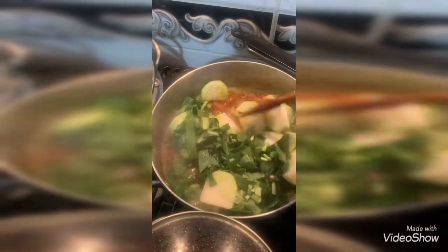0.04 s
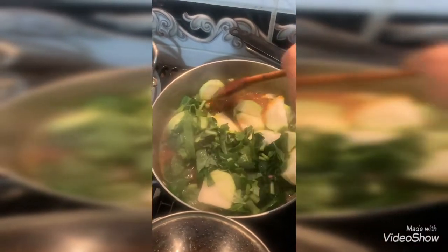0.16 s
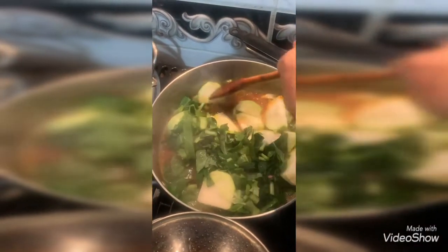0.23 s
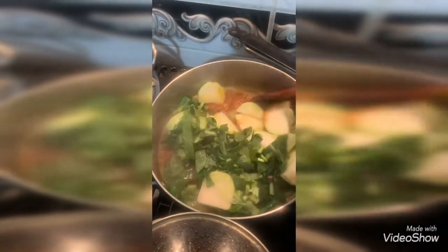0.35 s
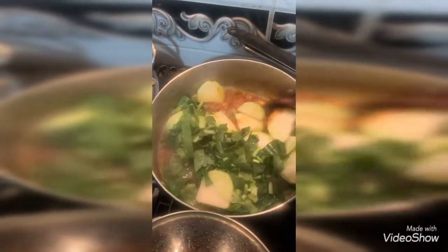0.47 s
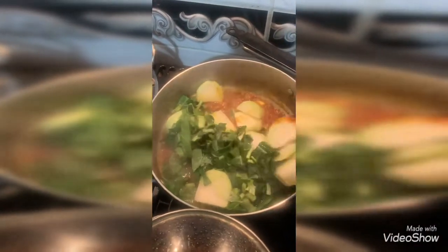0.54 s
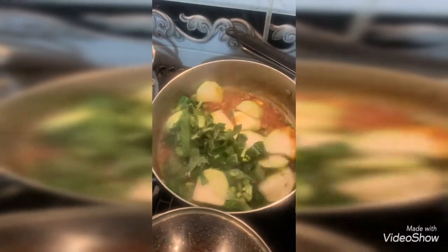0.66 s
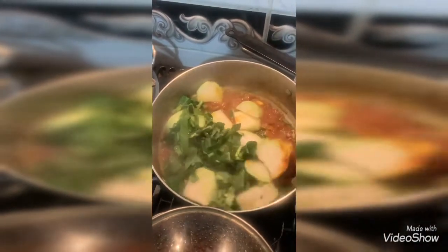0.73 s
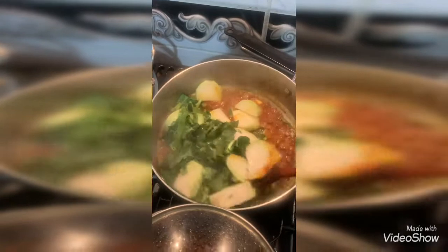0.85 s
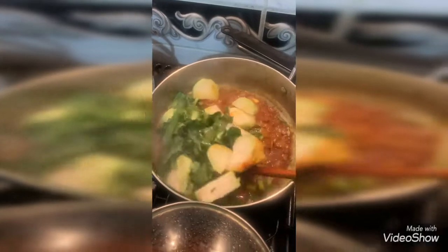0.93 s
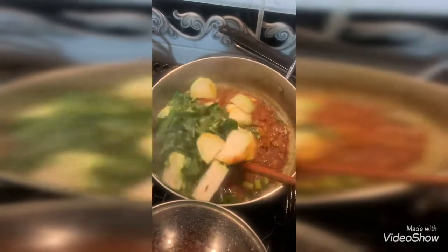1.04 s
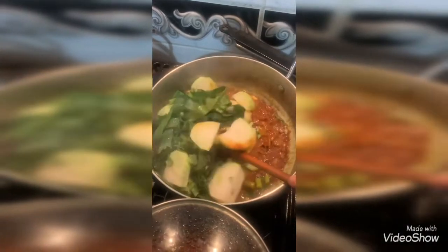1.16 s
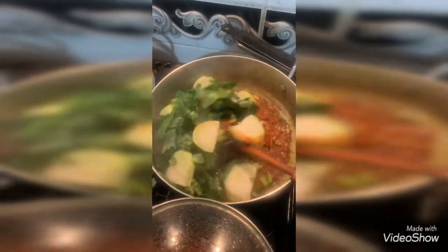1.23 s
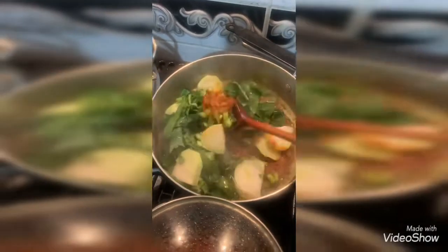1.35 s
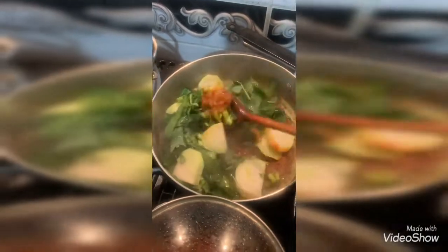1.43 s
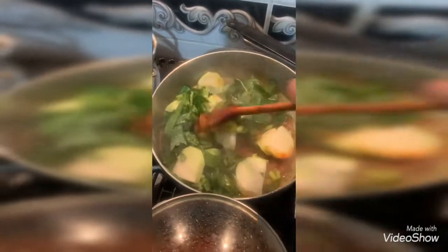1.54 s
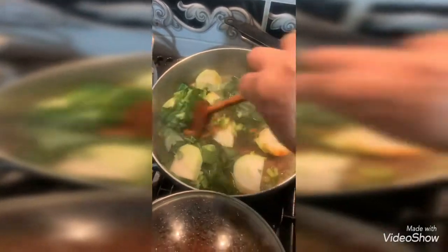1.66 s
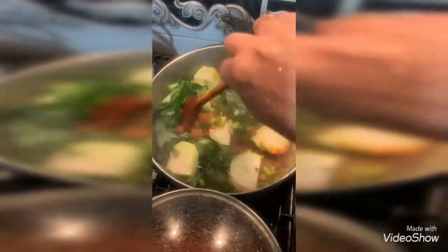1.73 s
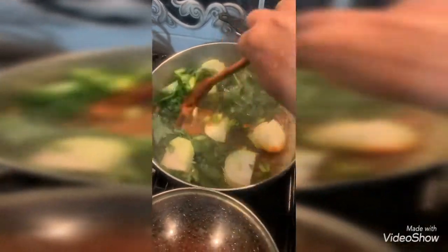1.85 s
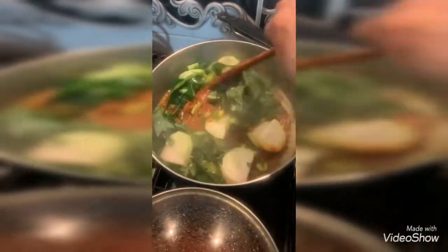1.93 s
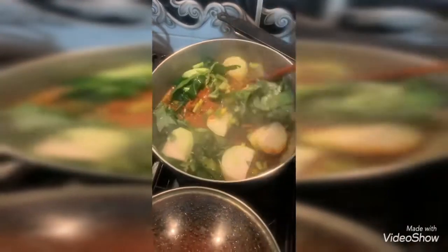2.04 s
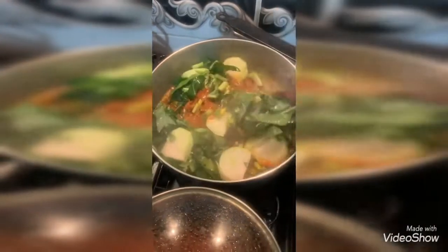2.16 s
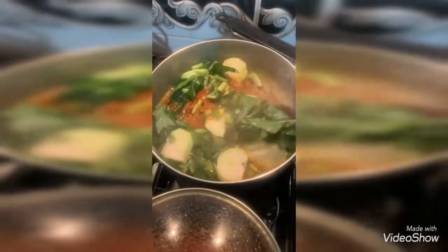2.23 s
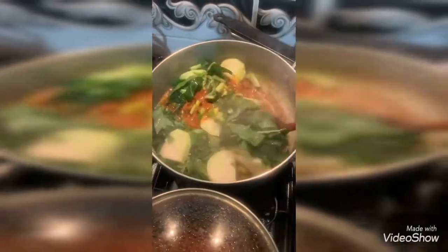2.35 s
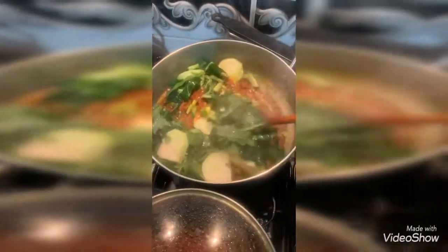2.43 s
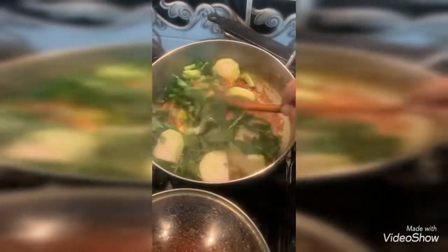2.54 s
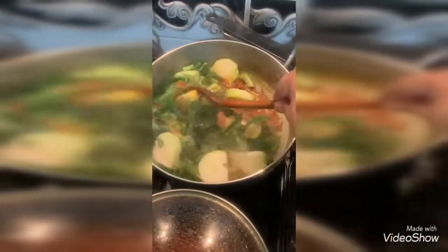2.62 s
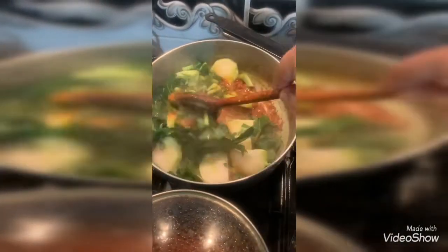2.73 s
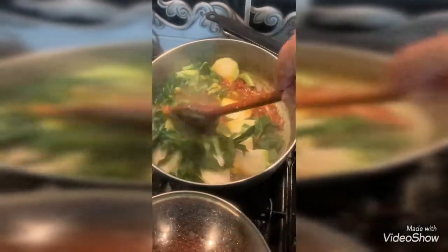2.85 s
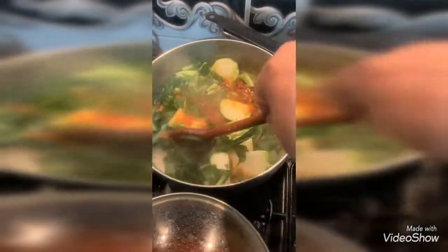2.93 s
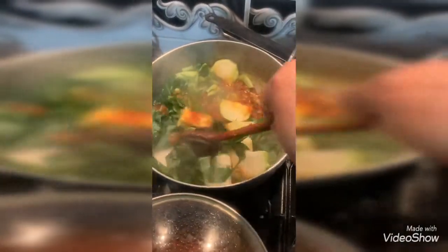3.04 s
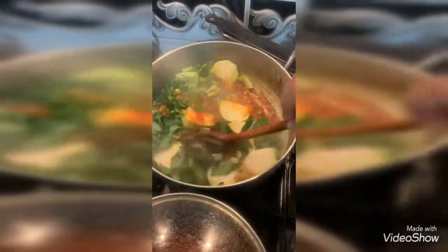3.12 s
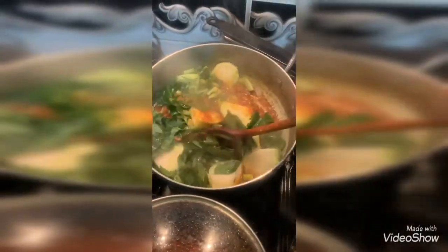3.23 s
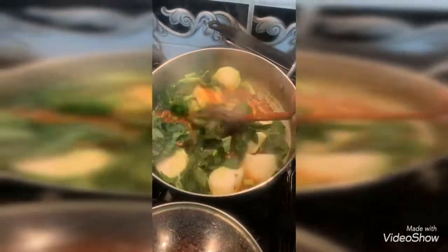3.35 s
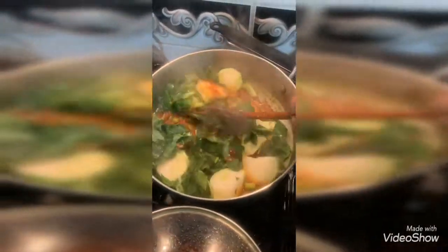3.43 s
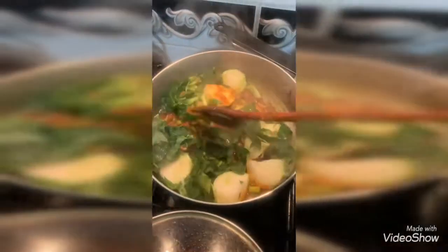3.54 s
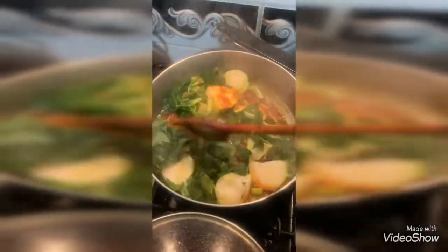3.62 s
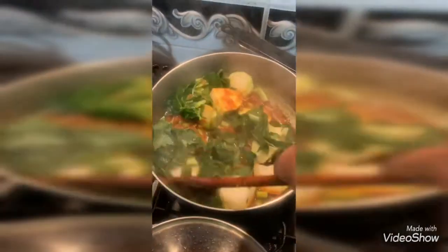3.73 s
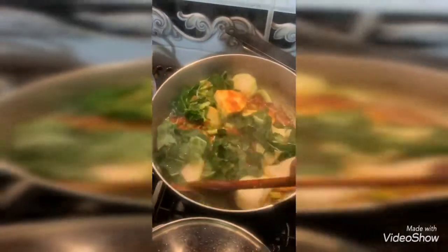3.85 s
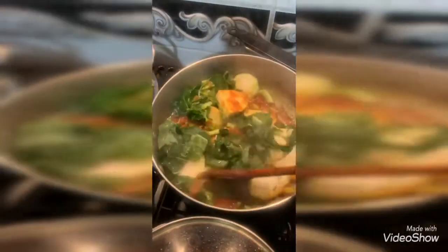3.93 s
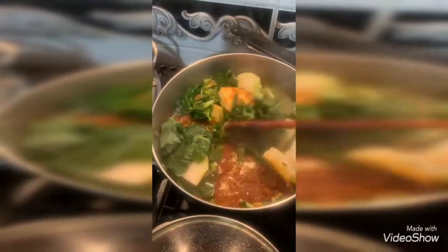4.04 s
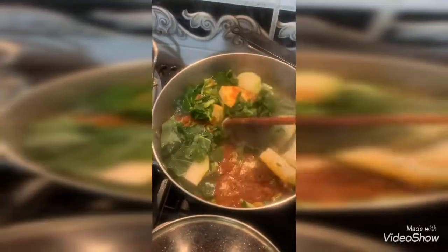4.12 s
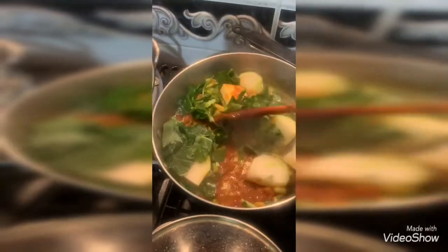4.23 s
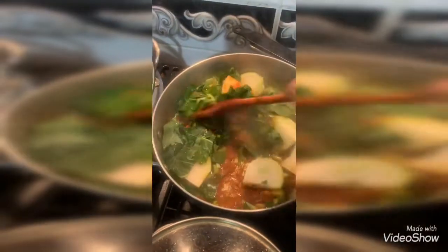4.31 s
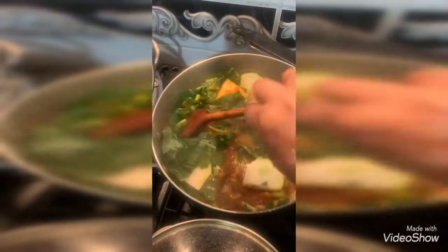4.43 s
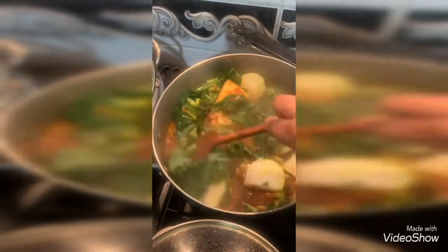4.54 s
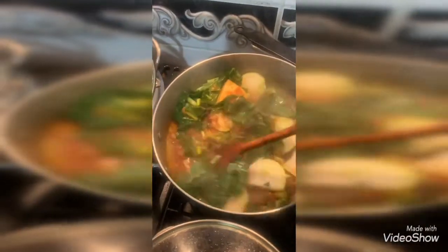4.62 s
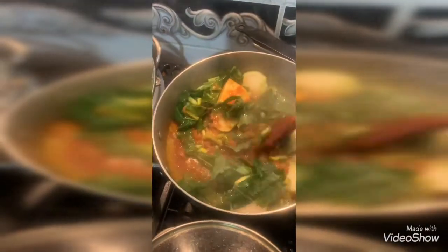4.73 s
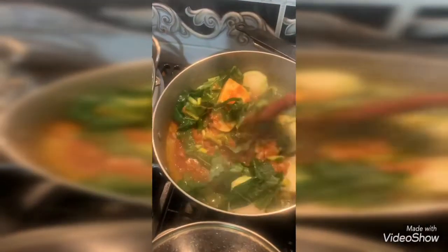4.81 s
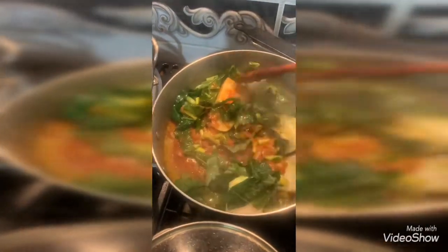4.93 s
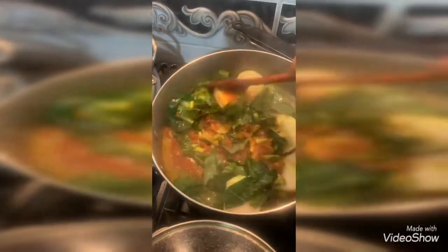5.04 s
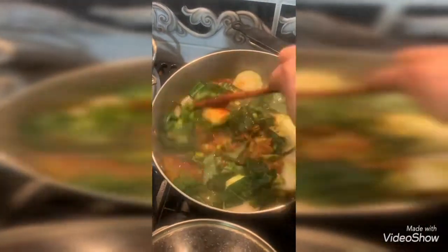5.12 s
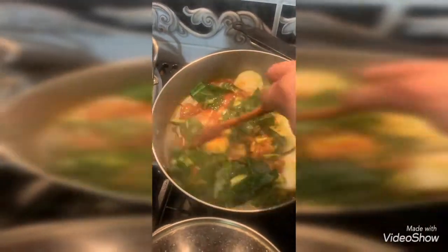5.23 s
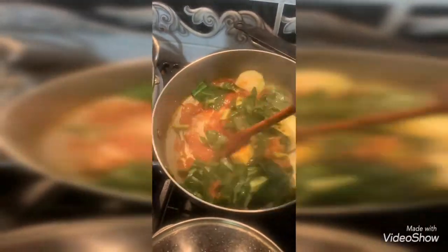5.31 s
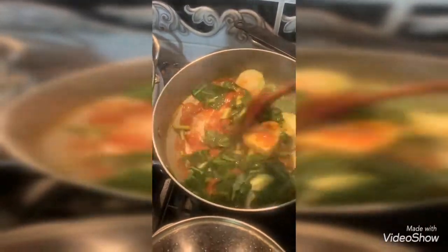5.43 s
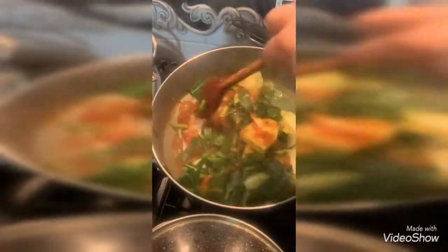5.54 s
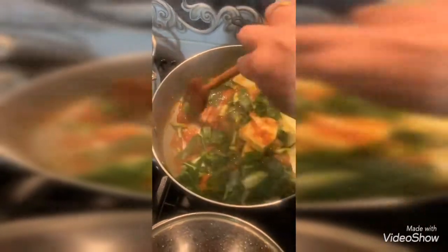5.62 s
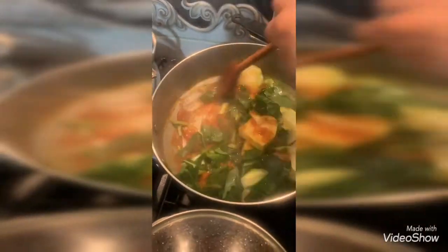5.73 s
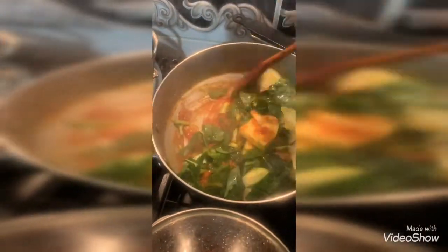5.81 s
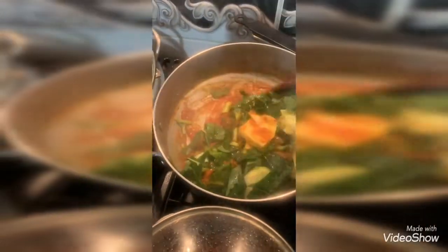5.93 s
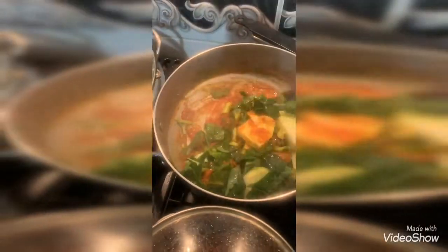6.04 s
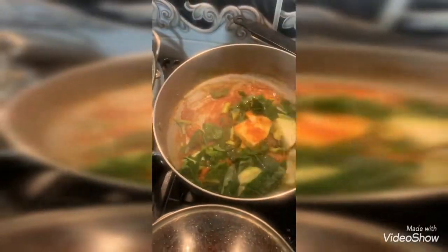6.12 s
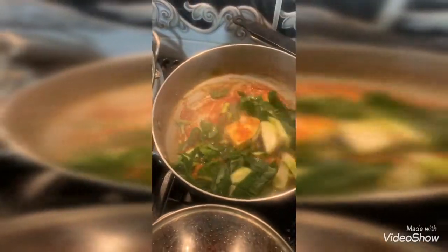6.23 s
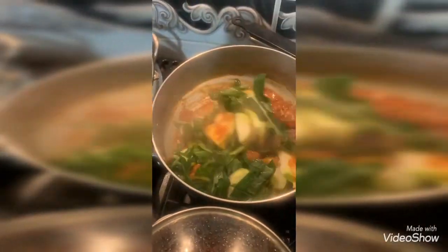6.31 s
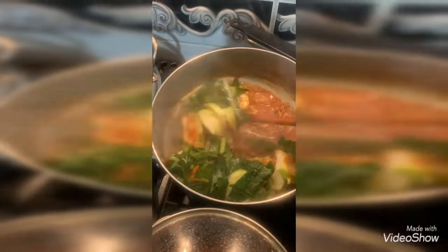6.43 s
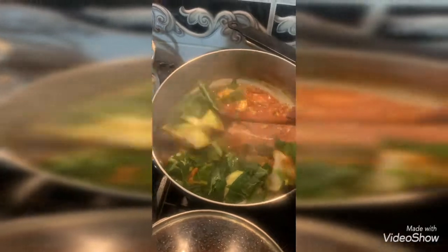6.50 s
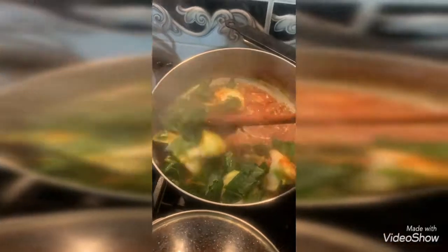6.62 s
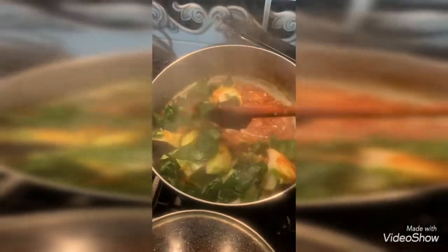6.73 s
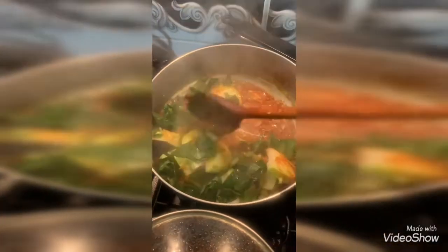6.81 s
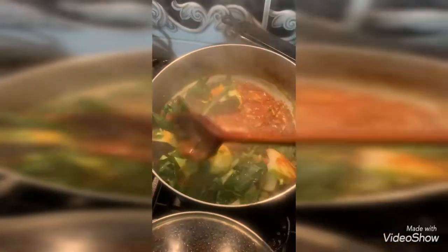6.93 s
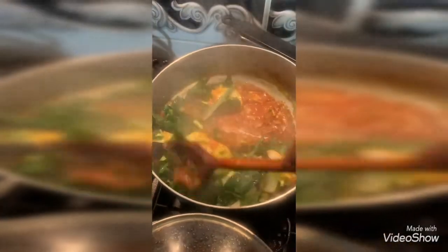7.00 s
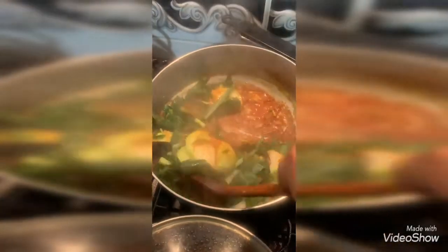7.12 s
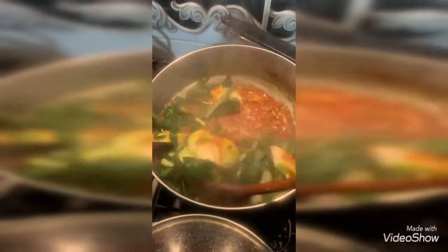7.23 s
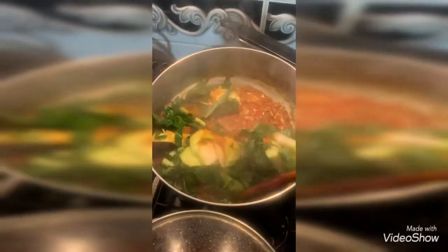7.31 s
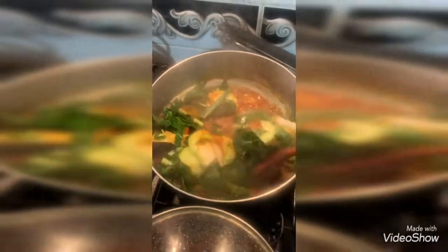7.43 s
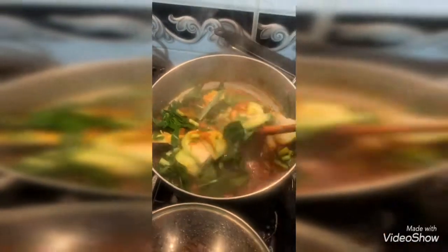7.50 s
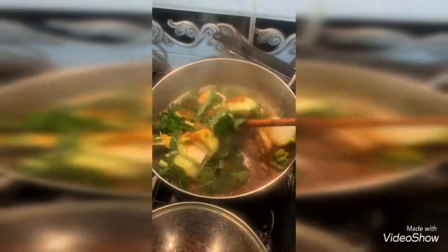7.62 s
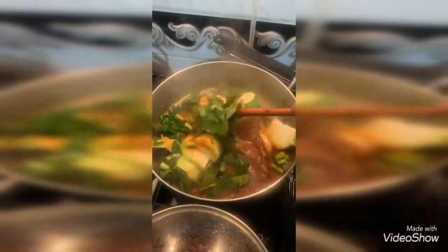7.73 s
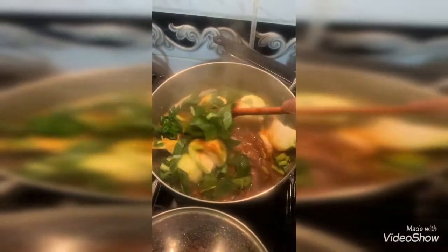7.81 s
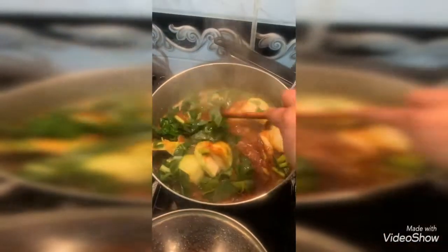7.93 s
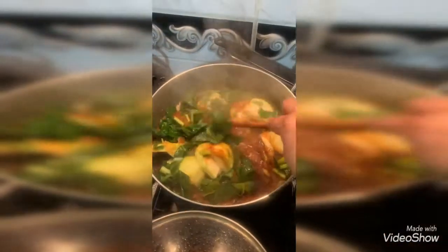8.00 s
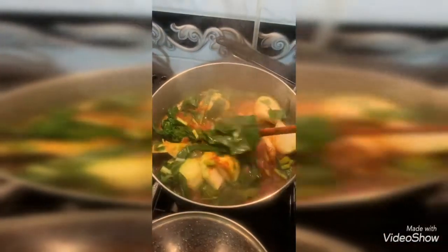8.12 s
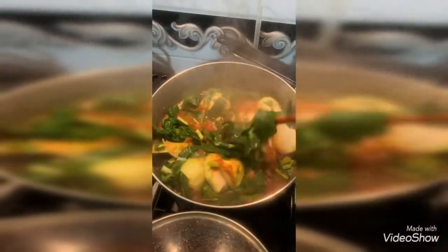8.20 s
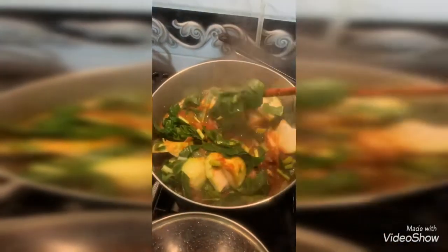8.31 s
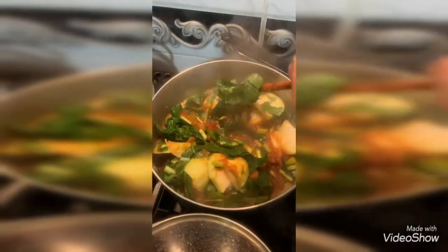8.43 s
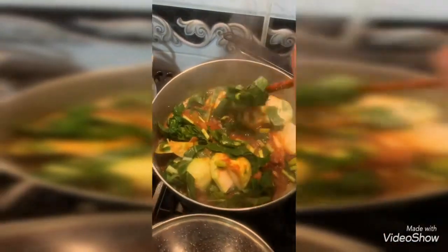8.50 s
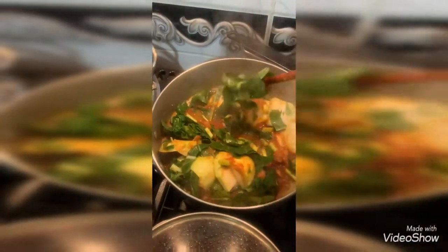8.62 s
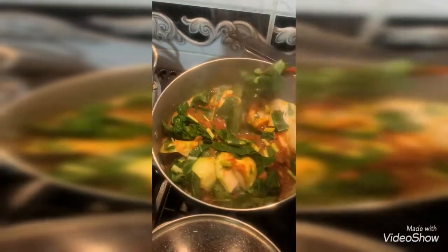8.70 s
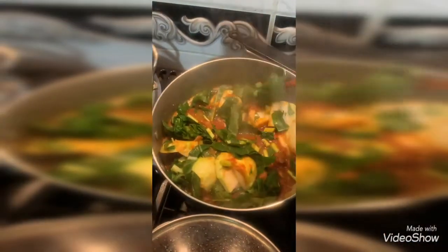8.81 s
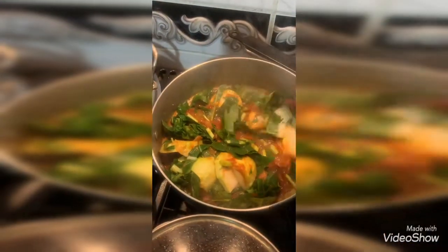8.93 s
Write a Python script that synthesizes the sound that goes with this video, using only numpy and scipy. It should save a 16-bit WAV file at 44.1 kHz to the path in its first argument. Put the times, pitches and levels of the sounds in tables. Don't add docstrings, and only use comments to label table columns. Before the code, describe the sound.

A quiet sizzle fades in slowly over a bassy, surging fan hum. Thick sauce simmers with soft plops and rounded pops while short sharp hisses of flashing droplets become more noticeable. A spoon turning the food makes the frying dip and return, with short dull wooden knocks on the damped pan, clustered towards the end. Close two-port phone microphone in a kitchen, treble cut off at the very top, with slightly watery compression.

```python
import sys
import numpy as np
from scipy import signal
from scipy.fft import rfft, irfft
from scipy.io import wavfile
from scipy.ndimage import uniform_filter1d

SR = 44100
rng = np.random.default_rng(int(sys.argv[2]) if len(sys.argv) > 2 else 0)


def waveform_to_disk(signal):
    frames = np.transpose(np.atleast_2d(signal))
    scaled = np.clip(frames, -1, 1) * 32767
    samples = np.round(scaled).astype(np.int16)
    wavfile.write(sys.argv[1], SR, samples)


def volts(x):
    e = np.asarray(x, float) / 20
    return 10 ** e


N = 395136
HZ = np.arange(N // 2 + 1) * SR / N + 1e-3
# start_s, level_db
SAUCE_BOIL = [(0, 0.5), (.5, .5), (.85, -2.5), (1.3, 0), (2.05, 3.5), (2.9, -0.3), (3.4, 2.5), (4.0, 2),
              (4.2, -0.5), (4.8, 0), (5.3, 2), (5.5, -0.5), (5.95, 1.5), (6.6, -1.5), (7.1, 0.5),
              (7.45, -3.5), (8.2, -3), (8.96, -4)]


def curve(table, column=1):
    table = np.array(table)
    return np.interp(np.arange(N) / SR, table[:, 0], table[:, column])


def shape(points):
    points = np.array(points)
    return np.interp(np.log(HZ), np.log(points[:, 0]), points[:, 1])


def unit(x):
    return x / np.sqrt(np.mean(x ** 2))


def walk(rate_hz):
    hold = int(SR / rate_hz)
    steps = np.repeat(rng.standard_normal(N // hold + 1), hold)
    return 1.6 * uniform_filter1d(uniform_filter1d(steps, hold), hold)[:N]


def bursts(per_s, spread_db):
    happens = rng.random(N) < per_s / SR
    size = np.minimum(rng.exponential(size=N), 4.5)
    sign = rng.standard_normal(N)
    return unit(happens * sign * volts(spread_db * size))


def bumps(table):
    t = np.arange(0, N, 64) / SR
    humps = sum(db * np.exp(-((t - s) / half) ** 2) for s, db, half in table)
    return np.interp(np.arange(N) / SR, t, humps)


def fade():
    t = np.arange(N) / SR
    end_db, climb_db_per_s = -42, 2.18
    steady = end_db - climb_db_per_s * (N / SR - t)
    return steady - 7 * np.exp(-t / .65) - 3 * np.exp(-t / 0.024)


def heaps():
    # start_s, level_db, half_length_s
    spoonfuls = [(.21, -5.5, 0.087), (.84, -1.5, 0.043), (1.17, -2, 0.046), (1.9, -0.5, 0.034),
                 (3.13, -2, 0.084), (4.09, -2.5, .05), (4.46, -2.5, .08), (5.1, -1, 0.053),
                 (7.29, -1.5, 0.057), (7.69, -1.5, 0.029), (7.97, -1.5, .05), (8.62, -1.5, 0.035),
                 (1.0, 1, .04), (3.46, 0.5, 0.05), (3.61, -1, .03), (4.21, 0.5, .04), (4.91, 0.5, 0.043),
                 (6.14, -2.5, 0.021), (6.36, 0.5, .05), (8.78, 1.5, 0.036), (8.86, -0.5, 0.029)]
    return bumps(spoonfuls)


def sizzle():
    # start_s, level_db
    bare_metal = [(0, 2), (.7, 1.5), (1.5, 2.5), (1.7, -.5), (2.6, 2.5), (3.0, 1), (3.9, 1.3), (4.2, 0),
                  (4.9, 1), (5.6, -1.1), (6.0, -1.4), (6.4, 2.5), (6.8, -.5), (7.2, -0.5), (7.6, 1.5),
                  (8.25, -1.5), (8.6, -1.1), (8.96, -1)]
    # frequency_hz, density_db (per Hz)
    fry_colour = [(800, -24.5), (1300, -13.5), (2000, -13), (2700, -12), (3600, -11), (5200, -8.5),
                  (6400, -9.5), (7600, -8.5), (8600, -3.5), (9600, -.5), (10400, -4.5), (11200, -5.5),
                  (13000, -12.5), (13800, -20), (14600, -28.5), (15200, -45)]
    # frequency_hz, likeness (0-1), lag_turns (of the right port)
    ports = [(600, .6, 0.25), (940, .5, .3), (1245, .5, 0.11), (1586, .65, .08), (2100, .6, 0.14),
             (2350, .4, 0.3), (2730, .6, 0.45), (3410, .6, 0.3), (4060, .7, 0.3), (4292, .9, 0.44),
             (5110, .92, 0.6), (6300, .92, 0.9), (7454, .92, 1.107), (8790, .83, 1.5), (10746, .94, 1.913),
             (11470, .93, 2.11), (12330, .88, 2.35), (12980, .86, 2.5), (13500, .85, 2.55),
             (14000, .6, 2.62), (14520, .6, 2.7)]
    trains = np.array([bursts(9000, 1.1), bursts(9000, .8), bursts(9000, .8)])
    paths, shared = 0, walk(18)
    for hz in 700 * 2 ** np.arange(0, 4.6, .5):
        octaves = np.clip(np.log2(HZ / hz) / .5, -1, 1)
        shared = 0.55 * shared + 0.38 * walk(17)
        swell = volts(.45 * shared + .9 * walk(32) + .7 * walk(19))
        own = np.roll(trains, rng.integers(N), axis=1)
        paths = paths + np.cos(octaves * np.pi / 2) * rfft((swell * own).astype(np.float32))
    like = np.clip(shape(ports), 0, 1)
    lag_turns = np.interp(HZ, np.array(ports)[:, 0], np.array(ports)[:, 2])
    late = np.exp(-2j * np.pi * lag_turns)
    common = paths[0] * np.array([np.ones_like(late), late])
    pair = np.sqrt(like) * common + np.sqrt(1 - like) * paths[1:]
    pair = pair * volts(shape(fry_colour))

    fine = 1 / (1 + (4600 / HZ) ** 6)
    thick = 1 / (1 + (HZ / 2300) ** 6)
    bare = fade() + curve(bare_metal) + heaps()
    wet = fade() + curve(SAUCE_BOIL) + .5 * heaps()
    simmer_db, wet_share = -4.5, 0.76
    high = unit(irfft(pair * fine, N)) * volts(bare + 9.5)
    simmer_level = wet_share * wet + (1 - wet_share) * bare + simmer_db
    low = unit(irfft(pair * (1 - fine - thick), N)) * volts(simmer_level)
    low = low + unit(irfft(pair * thick, N)) * volts(wet - 9 + .8 * walk(14))
    spit = rng.standard_normal(N) * volts(bare + simmer_db - 11.5 + 1.5 * walk(30))
    return high + low * volts([[-1.1], [1.1]]) + spit


def fan():
    # frequency_hz, density_db (per Hz)
    fan_colour = [(15, -52), (25, -34), (56, -7.5), (102, 1), (136, -6), (176, -5.5), (285, -12.5),
                  (444, -23.5), (519, -19), (769, -20.5), (897, -27), (1050, -33.5), (1500, -29.5),
                  (1950, -53), (3300, -120)]
    # pitch_hz, width_hz, level_db
    fan_tones = [(101.7, 9, -11), (169.8, 7.7, -16), (618, 78, -24.5), (769.5, 46, -18.5),
                 (1063, 85, -16.5)]
    # start_s, level_db, half_length_s
    surges = [(1.1, -1.5, .2), (2.2, 3.5, .1), (2.5, -1.5, 0.11), (3.4, -4, .06), (3.82, 5, 0.043),
              (4.4, 0, .1), (5.0, 3.5, 0.073), (5.5, -3.5, .06), (6.14, 7, .03), (6.25, -3, 0.06),
              (7.0, -0.5, .06), (7.35, -1, 0.094), (7.75, 2, .12), (8.1, -2, 0.066), (8.5, 2.5, 0.065),
              (8.78, 0, 0.038), (8.91, 4, 0.023), (.92, -2, .03), (1.49, 2, 0.037), (3.49, 6, .03),
              (3.62, 0, .04), (4.21, -1, .05), (7.89, 6, 0.027), (8.68, 3.5, 0.036), (8.86, -7, .03)]
    noise = rfft(rng.standard_normal((3, N)))
    air = volts(shape(fan_colour)) * (HZ < 1500)
    air = air / np.sqrt(np.sum(air ** 2))
    for hz, width, db in fan_tones:
        tone = 1 / (1 + ((HZ - hz) / (width / 2)) ** 2)
        air = np.hypot(air, volts(db) * tone / np.sqrt(np.sum(tone ** 2)))
    like = 1 / (1 + (HZ / 1050) ** 2.6)
    duct_dip = 1 - .6 / (1 + ((HZ - 770) / 50) ** 2)
    lead_s = 0.00006 * (1 + (HZ / 600) ** 2) * duct_dip
    lead = np.exp(2j * np.pi * HZ * lead_s)
    common = noise[0] * np.array([np.ones_like(lead), lead])
    pair = np.sqrt(like) * common + np.sqrt(1 - like) * noise[1:]
    pair = pair * volts(np.array([[1], [-1]]) / (1 + (HZ / 280) ** 2))
    sound = unit(irfft(pair * air, N))
    bass = irfft(rfft(sound) / (1 + (HZ / 150) ** 4), N)
    surging = sound + bass * (volts(bumps(surges)) - 1)
    return surging * volts(fade() + 1.3 + .5 * walk(4))


def plops():
    train, out = bursts(18, 0.99), 0
    cycles = 30
    for hz in 1050 * 2 ** np.arange(0, 1.9, .16):
        pole = np.exp(np.pi * hz / SR * (2j - 1 / cycles))
        trains = [np.roll(train, int(share * N)) for share in rng.random(size=2)]
        ring = signal.lfilter([pole.imag], [1, -2 * pole.real, abs(pole) ** 2], trains)
        out = out + np.sqrt(hz) * ring / pole.imag * hz
    pair = out[0] + .6 * out[1] * np.array([[1], [-1]])
    return unit(pair) * volts(fade() + curve(SAUCE_BOIL) - 12.5)


def flickers(extra_db):
    # start_s, length_s, level_db
    flickers_4k = [(2.178, 0.052, -78), (2.745, 0.05, -76), (2.888, 0.04, -75), (3.258, 0.1, -73),
                   (3.511, 0.052, -73), (3.589, 0.036, -75), (3.986, 0.03, -82), (4.184, 0.04, -78),
                   (4.299, 0.052, -73), (5.036, 0.06, -69.5), (5.227, 0.032, -81), (5.297, 0.05, -76),
                   (5.459, 0.124, -75), (5.985, 0.042, -82), (6.049, 0.03, -82), (6.428, 0.04, -81),
                   (6.534, 0.036, -83), (6.927, 0.08, -80), (7.069, 0.1, -79), (7.434, 0.15, -65),
                   (7.803, 0.044, -82), (7.909, 0.084, -81), (8.025, 0.048, -81), (8.296, 0.041, -79),
                   (8.418, 0.048, -81), (8.494, 0.062, -81), (8.647, 0.06, -81), (8.767, 0.038, -83)]
    flickers_13k = [(4.253, 0.052, -64), (4.908, 0.045, -58), (4.974, 0.098, -61), (5.099, 0.032, -69),
                    (5.542, 0.032, -69), (5.951, 0.048, -63), (6.061, 0.036, -71), (6.313, 0.074, -59),
                    (6.63, 0.054, -68), (7.105, 0.11, -62), (7.843, 0.086, -58), (8.36, 0.064, -57),
                    (8.512, 0.032, -70), (8.715, 0.062, -62), (8.905, 0.052, -66)]
    early_flickers_14k = [(0.004, 0.041, -79), (0.114, 0.057, -87), (0.245, 0.28, -78), (0.569, 0.116, -79),
                          (0.75, 0.046, -80)]
    flickers_14k = [(0.408, 0.044, -80), (1.009, 0.054, -71), (1.28, 0.056, -71), (1.386, 0.112, -71.5),
                    (1.542, 0.038, -76), (1.595, 0.05, -75), (1.709, 0.03, -76), (1.831, 0.07, -77),
                    (2.03, 0.22, -70), (2.402, 0.11, -72), (2.681, 0.04, -74), (2.849, 0.172, -72),
                    (3.074, 0.112, -73), (3.244, 0.032, -71), (3.421, 0.036, -69), (3.511, 0.038, -76),
                    (3.655, 0.041, -69), (3.75, 0.138, -69), (4.052, 0.072, -75), (4.207, 0.098, -69),
                    (4.445, 0.09, -71), (4.569, 0.11, -68), (4.718, 0.066, -69), (4.906, 0.047, -68),
                    (4.978, 0.094, -71), (5.143, 0.032, -78), (5.367, 0.05, -67), (5.459, 0.144, -68),
                    (5.626, 0.043, -70), (5.856, 0.05, -70), (5.951, 0.052, -69), (6.019, 0.084, -71),
                    (6.313, 0.064, -63.5), (6.81, 0.042, -67), (7.041, 0.044, -64.5), (7.133, 0.092, -72),
                    (7.255, 0.038, -76), (7.538, 0.052, -75), (7.737, 0.054, -65), (7.849, 0.08, -66),
                    (8.192, 0.03, -78), (8.362, 0.194, -66), (8.576, 0.27, -61), (8.897, 0.06, -61)]
    flickers_14k7 = [(.3, .2, -84), (.64, .04, -81), (1.43, .07, -75), (1.705, .042, -76), (1.83, .05, -75),
                     (2.09, .05, -76), (2.48, .05, -75), (3.5, .045, -75), (4.2, .045, -74), (4.61, .05, -72),
                     (5.62, .05, -68.5), (8.6, .05, -64), (8.73, .07, -69)]
    flickers_15k = [(1.428, 0.058, -75), (3.08, 0.034, -75), (3.19, 0.042, -73), (3.491, 0.046, -72),
                    (3.77, 0.04, -75), (3.834, 0.04, -77), (4.632, 0.04, -72), (4.718, 0.054, -69),
                    (4.882, 0.048, -72), (5.137, 0.05, -71), (5.544, 0.032, -75), (5.63, 0.04, -74),
                    (6.327, 0.036, -74), (6.69, 0.046, -66), (6.853, 0.043, -67), (6.967, 0.054, -67),
                    (7.179, 0.048, -62), (7.247, 0.054, -68), (7.524, 0.069, -63), (7.737, 0.192, -67),
                    (8.18, 0.05, -68), (8.412, 0.13, -63), (8.572, 0.11, -64), (8.709, 0.104, -59),
                    (8.905, 0.052, -74)]
    # low_hz, high_hz
    flicker_bands = [(4320, 4650), (13100, 13750), (13800, 14450), (14500, 15000), (15050, 15700)]
    groups = [flickers_4k, flickers_13k, list(early_flickers_14k) + list(flickers_14k), flickers_14k7, flickers_15k]
    out, noise = np.zeros(N), rfft(rng.standard_normal(N))
    for table, (low, high) in zip(groups, flicker_bands):
        hiss = unit(irfft(noise * (HZ > low) * (HZ < high), N))
        for s, length, db in table:
            i = int(s * SR)
            window = np.sqrt(np.hanning(int(length * SR)))
            out[i:i + len(window)] += window[:N - i] * hiss[i:i + len(window)] * volts(db + extra_db)
    return out


def pops():
    # start_s, peak_db, pitch_hz
    single_bubbles = [(0.1196, -63, 2610), (0.2596, -57, 1210), (0.7163, -57, 3440), (0.8789, -58, 3380),
                      (1.3184, -51, 3150), (1.4092, -53, 1570), (1.931, -50, 3350), (2.1211, -45, 2230),
                      (2.3895, -50, 1670), (2.7282, -49, 3070), (2.9008, -51, 2510), (3.5059, -45, 2410),
                      (3.7179, -46, 3320), (4.2413, -45, 3390), (4.37, -49, 3330), (4.6568, -41, 3510),
                      (4.9886, -45, 2110), (5.2694, -41, 1670), (5.4615, -45, 1640), (5.5662, -43, 3330),
                      (5.6421, -44, 3370), (5.7798, -41, 1620), (6.115, -44, 2590), (6.544, -47, 1860),
                      (6.972, -43, 1500), (7.0768, -45, 2360), (7.6954, -40, 2310), (7.7303, -42, 3180),
                      (8.714, -35, 1210)]
    out, t = np.zeros(N), np.arange(SR // 20) / SR
    cycles = 15
    for s, db, hz in single_bubbles:
        decay = np.exp(-t * hz * np.pi / cycles)
        ring = np.sin(2 * np.pi * hz * t * (1 + 3 * t)) * decay * (1 - np.exp(-t / .001))
        i = int(s * SR)
        out[i:i + len(t)] += ring[:N - i] * volts(db - 2)
    return np.array([.8 * out, np.roll(out, 5)])


def spoon():
    # start_s, peak_db, pitch_hz, t60_s, sharpness_db (of the contact)
    knocks = [(0.262, -62, 653, 0.07, 0), (0.275, -58.5, 627, 0.07, 1), (0.429, -63.5, 682, 0.07, -2),
              (4.413, -45, 661, 0.1, -0.5), (1.152, -66, 770, 0.065, 0), (3.508, -62, 807, 0.041, 3),
              (3.767, -58, 662, 0.045, -1), (4.664, -55, 622, .05, 0), (4.778, -55, 501, 0.047, -1),
              (7.217, -53, 680, .05, 0), (7.822, -47.5, 762, 0.057, 0), (8.925, -47, 775, 0.043, -2.5),
              (5.62, -46.5, 641, 0.055, -2), (7.315, -47.5, 836, 0.06, -1.5), (7.593, -53, 544, 0.07, -1.5),
              (8.717, -38, 643, 0.07, -0.5), (8.745, -46.5, 1080, 0.06, -5), (8.784, -44.5, 482, 0.07, 1.5)]
    # pitch_ratio, level_db, t60_share
    pan_modes = [(.55, -4.5, 0.87), (1, 3, 1), (1.55, -2.5, 0.69), (1.8, -3.5, 0.61), (2.5, -6, .3)]
    out, t = np.zeros((2, N)), np.arange(SR // 4) / SR
    band = signal.butter(2, [420, 1150], "band", fs=SR, output="sos")
    edge = signal.butter(2, [1100, 2100], "band", fs=SR, output="sos")
    for s, db, hz, t60, sharp_db in knocks:
        fall = t * np.log(1000) / max(t60, .01)
        ring = 0
        for ratio, mode_db, share in pan_modes:
            level = volts(mode_db + sharp_db * np.log2(ratio))
            ring = ring + level * np.sin(2 * np.pi * hz * ratio * t) * np.exp(-fall / share)
        tail = signal.sosfilt(band, rng.standard_normal((2, len(t)))) * np.exp(-fall / 2.4)
        crack = signal.sosfilt(edge, rng.standard_normal(len(t))) * np.exp(-t / .003)
        crack = crack * volts(11.0 + 3.5 * sharp_db)
        blow = (ring + crack + volts(11.0) * tail) * (1 - np.exp(-t / .0009)) * volts(db - 0.4)
        i = int((s - .0015) * SR)
        out[:, i:i + len(t)] += blow[:, :N - i]
    return out


def scene():
    return sizzle() + fan() + plops() + flickers(extra_db=2.2) + pops() + spoon()


def coarse_spectrum(x):
    # frequency_hz, step_db
    step_sizes = np.array([(300, -30), (1200, -19), (1800, -11), (2300, -5.5), (2850, -2.5), (3500, -3),
                           (4400, -4.5), (5200, -7), (6500, -6), (9300, -2.5), (12000, -5.5), (13300, -7.5),
                           (14000, -8.5), (14600, -11), (15700, -13.5)])
    # start_s, length_frames, centre_hz
    holes = [(.08, 2, 3010), (.17, 2, 3010), (.29, 2, 2760), (.68, 2, 2670), (.92, 2, 3010),
             (1.38, 2, 3010), (1.52, 3, 2670), (3.86, 2, 2670), (4.53, 2, 3700), (5.51, 2, 3190),
             (5.84, 2, 3400), (5.96, 2, 3200), (7.2, 2, 3190), (.21, 2, 2670), (.4, 2, 2840),
             (.49, 2, 3010), (.65, 3, 3010), (1.0, 2, 2930), (1.05, 3, 2670), (1.14, 4, 2670),
             (1.3, 3, 2670), (2.35, 3, 2930), (3.37, 2, 2670), (4.04, 2, 3010), (4.28, 3, 3700),
             (4.35, 2, 3010), (4.74, 14, 3010), (4.9, 4, 3100), (5.02, 2, 2760), (5.42, 2, 2930),
             (5.72, 2, 2930), (6.25, 2, 2840), (6.99, 2, 3010), (7.39, 2, 2670), (7.99, 2, 2670),
             (8.22, 2, 2670), (8.5, 2, 2670), (8.64, 3, 2670), (8.87, 3, 2930)]
    hop, grid = 1024, 131
    bands = np.r_[0:608:4, 608:1024:16]
    width = np.diff(np.r_[bands, hop])
    n = np.arange(2 * hop)
    window = np.sin(np.pi * (n + .5) / (2 * hop))
    basis = np.cos(np.pi / hop * np.outer(n + (hop + 1) / 2, n[:hop] + .5)) * window[:, None]
    margins = ((0, 0), (2 * hop - grid, hop + (grid - N) % hop))
    blocks = np.pad([x[0] + x[1], x[0] - x[1]], margins).reshape(2, -1, hop) / 2
    lines = np.concatenate([blocks[:, :-1], blocks[:, 1:]], axis=2) @ basis

    loud = np.sqrt(np.mean(lines[:, :, 90:600] ** 2, axis=(0, 2)))[:, None]
    centre_hz = (bands + width / 2) * SR / (2 * hop)
    step_db = np.interp(np.log(centre_hz), np.log(step_sizes[:, 0]), step_sizes[:, 1])
    step = loud * volts(step_db + 2.03 * rng.standard_normal((2, len(loud), len(bands))))
    rms = np.sqrt(np.add.reduceat(lines ** 2, bands, axis=2) / width)
    whim = rng.standard_normal((2, *rms.shape))
    slow = uniform_filter1d(uniform_filter1d(rms, size=3, axis=1), size=5, axis=2)
    partner = slow[::-1]
    masked = (slow < partner * volts(-6.5 + 1.02 * whim[0])) & (bands > 185)
    kept = (rms > step * volts(-3.5 + 1.2 * whim[1])) | (bands < 600)
    step = np.where(masked, np.maximum(step, partner * volts(7.5)), step)
    for s, count, hz in holes:
        first = round((s * SR - grid) / hop) + 1
        kept[0, first:first + count, np.abs((bands + 2) * SR / (2 * hop) - hz) < 135] = False

    masked, step, kept = [np.repeat(values, width, axis=2) for values in (masked, step, kept)]
    steps = np.floor(np.abs(lines / step) ** .75 + .4054)
    rounded = np.sign(lines) * steps ** (4 / 3)
    blurred = rounded + ~masked * volts(-27.0) * rng.laplace(size=lines.shape)
    frames = (kept * step * blurred) @ basis.T * 2 / hop
    joined = (frames[:, 1:, :hop] + frames[:, :-1, hop:]).reshape(2, -1)
    mid, side = joined[:, hop - grid:][:, :N]
    return np.array([mid + side, mid - side])


def roll_off(x):
    return signal.sosfilt(signal.butter(12, 15820, fs=SR, output="sos"), x)


def record(dry):
    mix = coarse_spectrum(dry)
    return roll_off(mix)


dry = scene()
out = record(dry)
waveform_to_disk(out)
```